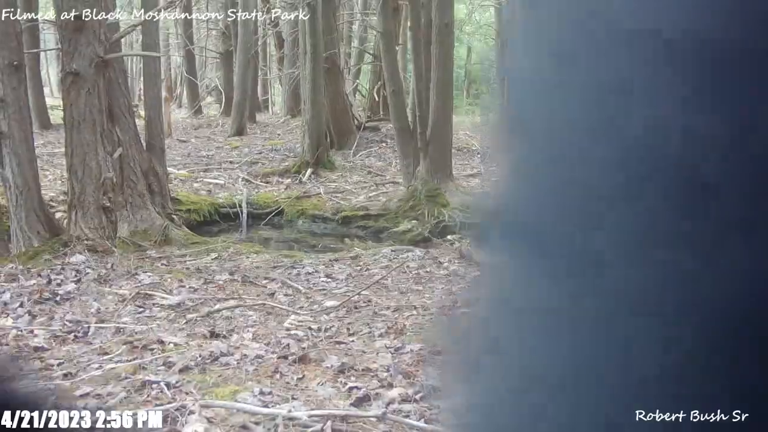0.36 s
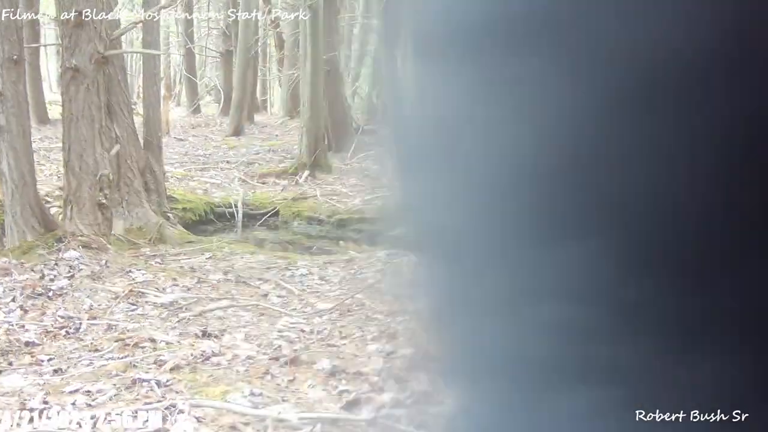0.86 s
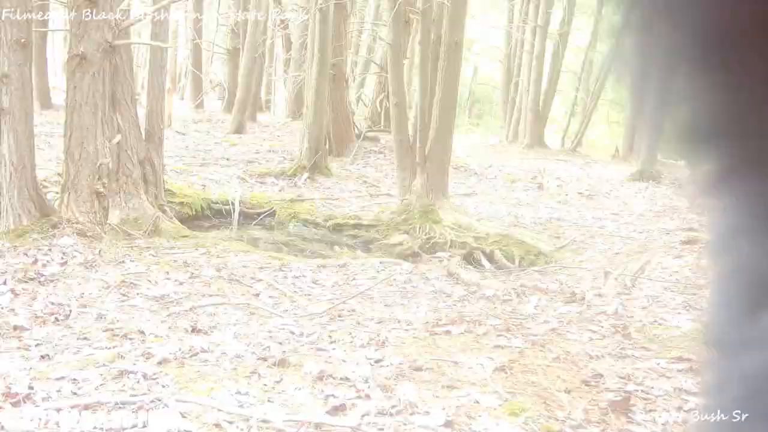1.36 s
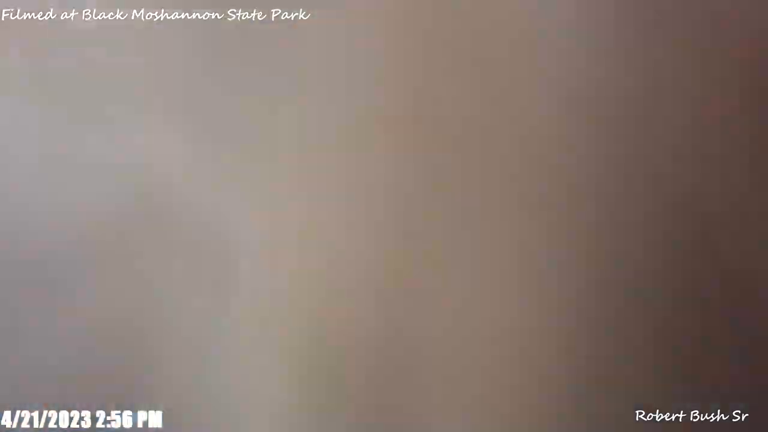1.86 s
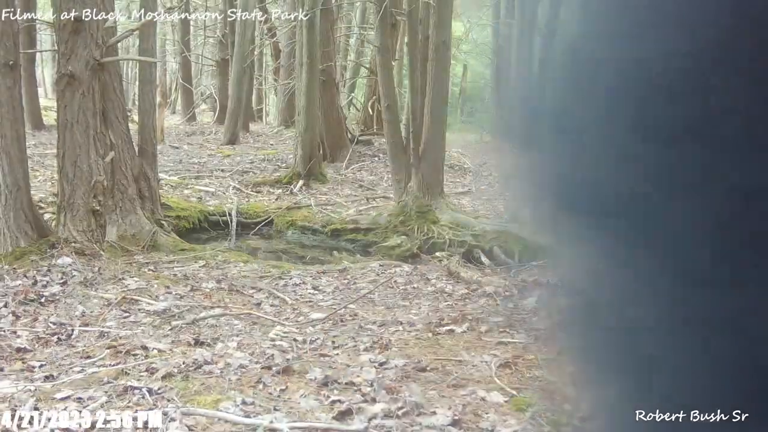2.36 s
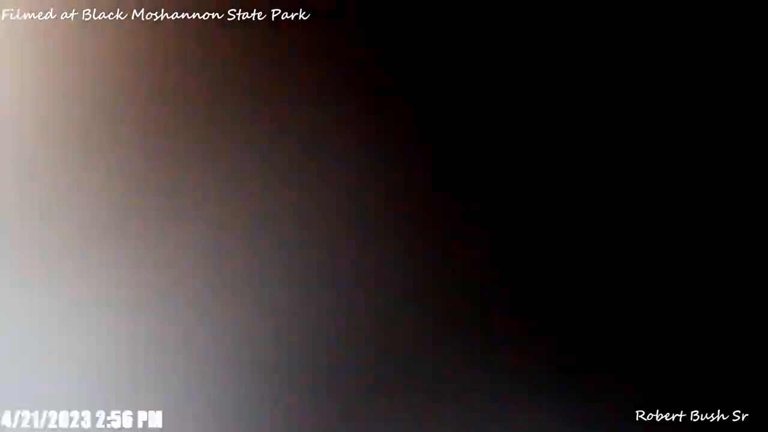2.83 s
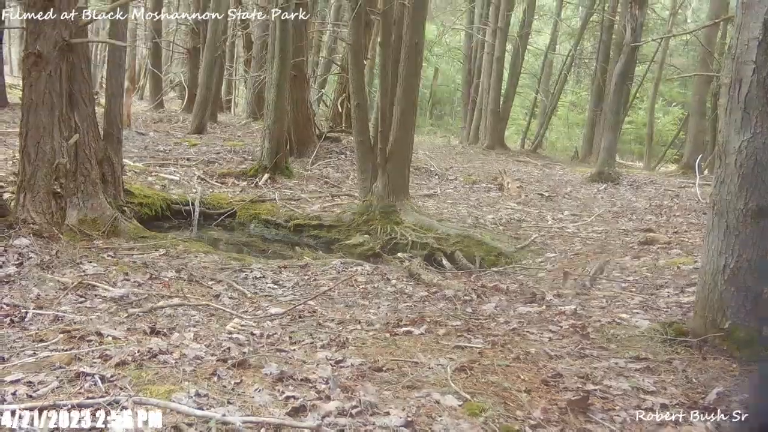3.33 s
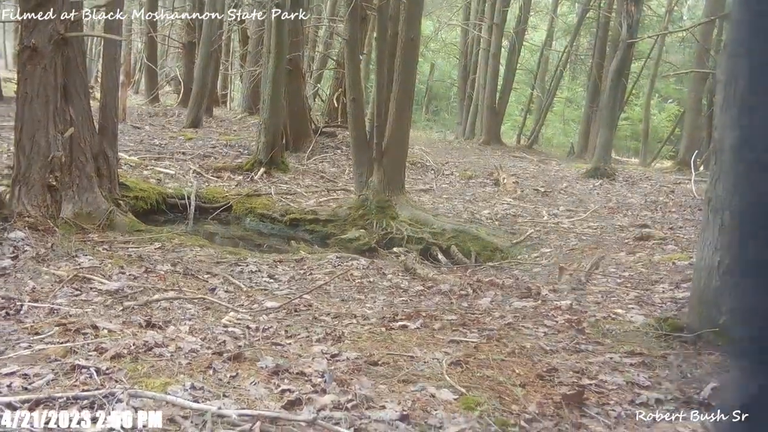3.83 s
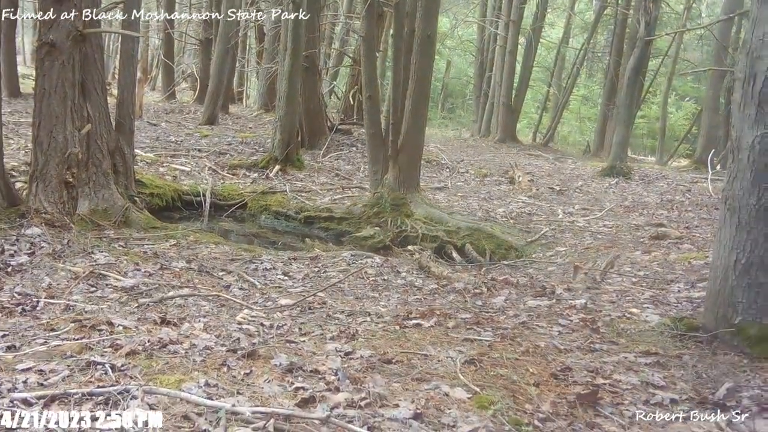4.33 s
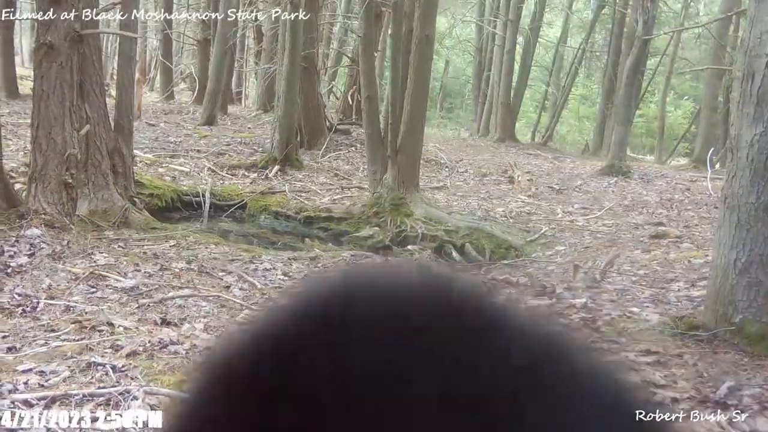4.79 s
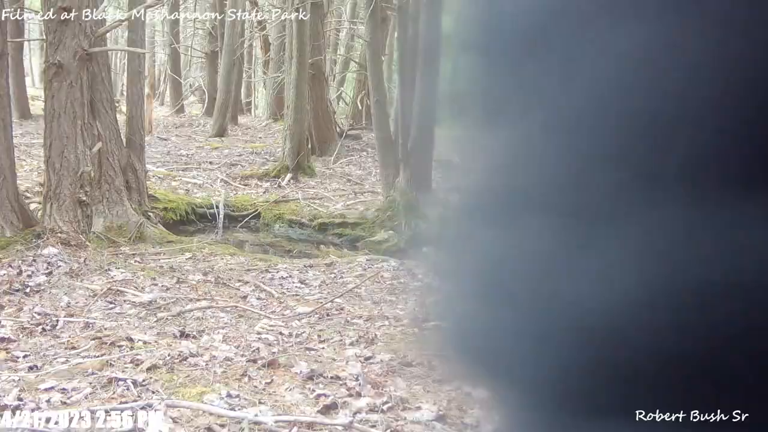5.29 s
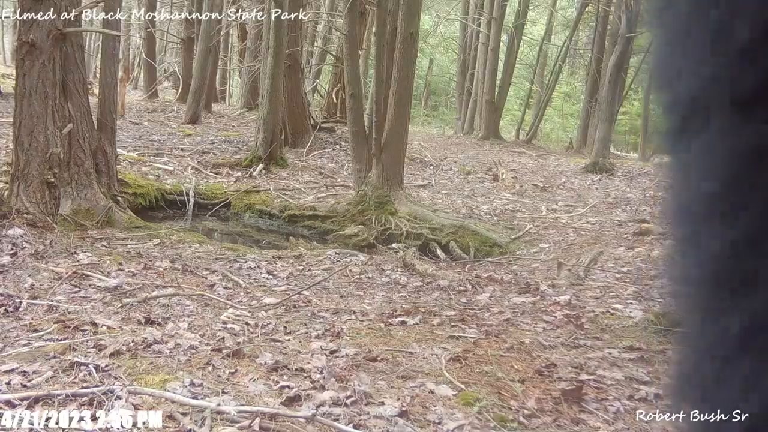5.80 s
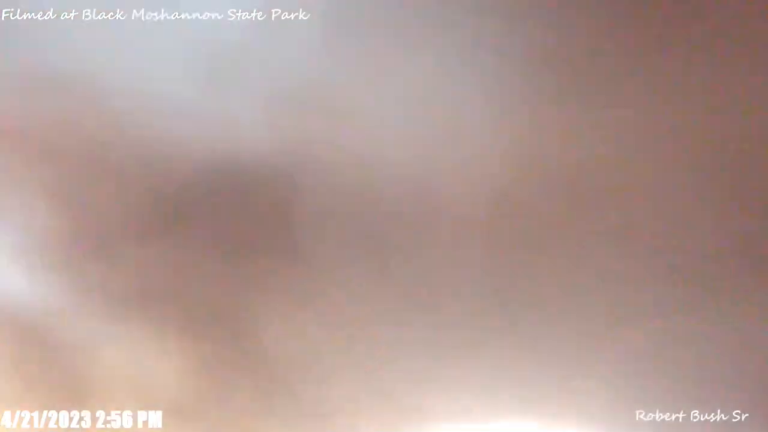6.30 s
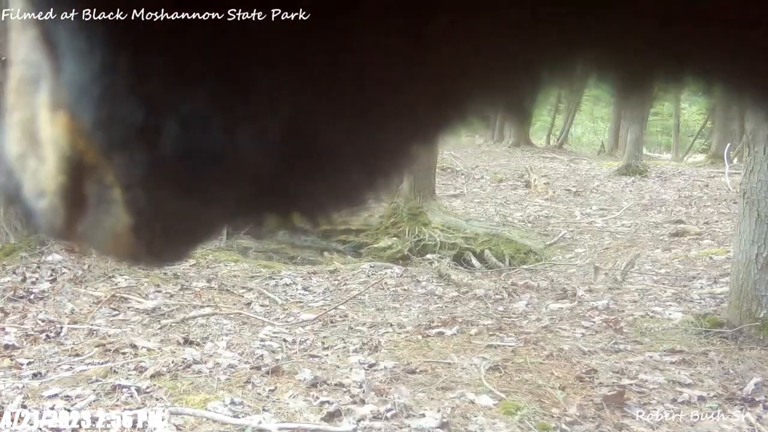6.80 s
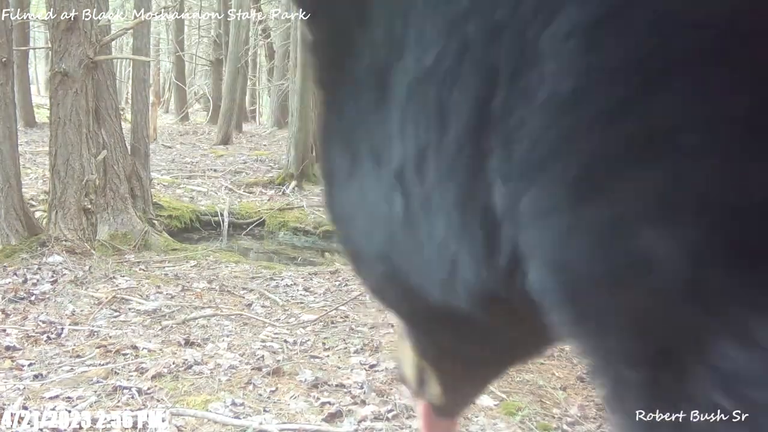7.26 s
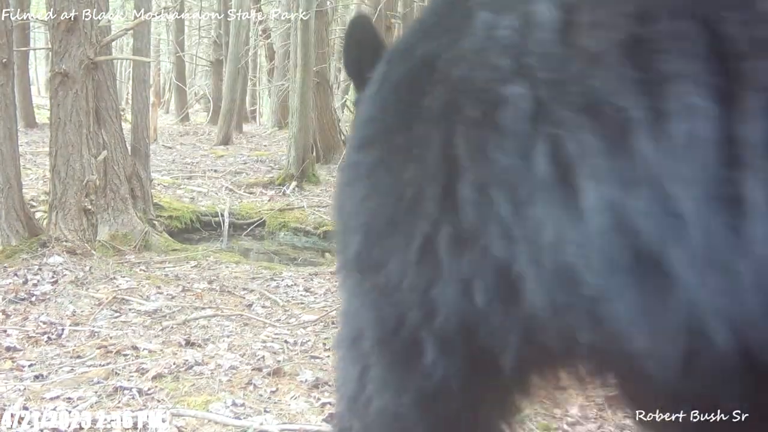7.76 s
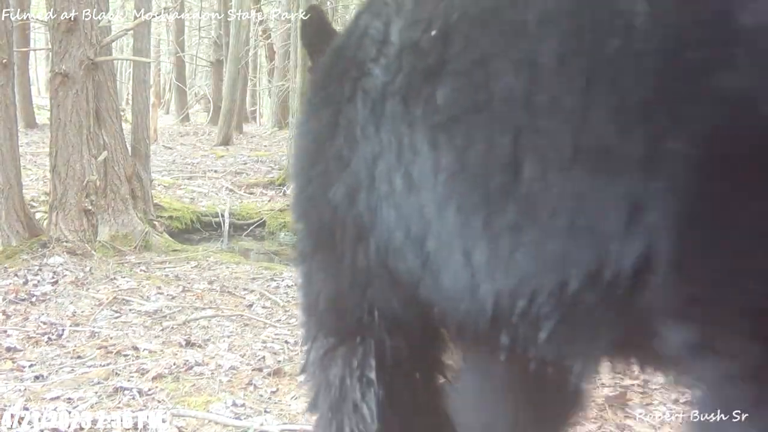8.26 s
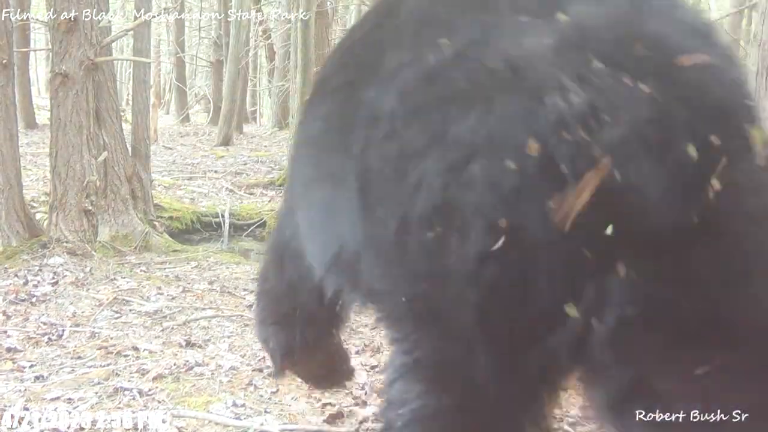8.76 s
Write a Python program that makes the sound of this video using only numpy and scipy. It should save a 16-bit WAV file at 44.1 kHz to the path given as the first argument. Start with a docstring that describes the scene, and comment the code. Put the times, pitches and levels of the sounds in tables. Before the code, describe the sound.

Close, coarse fur scrapes and sharp hollow plastic blows batter a shell on a tree, easing to a faint hiss at the end.

```python
"""Fur rasps over a thin plastic shell, and at once a hard blow lands, over quiet woodland.
A bear noses a small camera housing strapped to a tree: fur and muzzle drag in strokes of slipping
hairs; teeth, claws and the latch give knocks, skids and pushes on the mount.
The microphone sits inside the shell, hears its modes, and overloads on the hardest blows."""
import sys
import numpy as np
from scipy import signal
from scipy.fft import rfft, irfft
from scipy.io import wavfile
from scipy.ndimage import uniform_filter1d

SR = 44100
rng = np.random.default_rng(int(sys.argv[2]) if len(sys.argv) > 2 else 0)


def to_linear_factor(level_db):
    """Convert decibel levels (scalar or array-like) to linear amplitude factors."""
    exponent = np.asarray(level_db, float) / 20
    return 10 ** exponent


def wrap_up_sound(samples):
    """Save the sound to the file named by the first command line argument, as 16-bit audio."""
    columns = np.atleast_2d(samples).T
    # keep every value between -1 and 1, then stretch to whole-number steps
    tamed = np.clip(columns, -1, 1)
    steps = np.round(tamed * 32767).astype(np.int16)
    wavfile.write(sys.argv[1], SR, steps)


N = 391608


def evened(x):
    """Scales to rms 1."""
    return x / np.sqrt(np.mean(x ** 2) + 1e-20)


def add(mix, start_s, sound):
    """Mixes a sound in at start_s."""
    part = mix[round(start_s * SR):][:len(sound)]
    part += sound[:len(part)]


def woods():
    """Far leaves and preamplifier hiss as coloured noise, with the electronics' whine as thin sines."""
    # spectrum of the hiss, relative: hz, density_db
    hiss_colour = [(20, -11.5), (60, -2.5), (350, 3), (960, 4.5), (1700, 0.5), (2550, -4.5), (4000, -16.5),
                   (6200, -30), (9000, -33), (16000, -38.5)]
    # electronics: pitch_hz, rms_db
    whine_tones = [(7827, -83), (7768, -91)]
    hiss_rms_db = -56
    hz = np.fft.rfftfreq(N, 1 / SR)
    point_hz, density_db = np.transpose(hiss_colour)
    colour = to_linear_factor(np.interp(np.log(hz + 1), np.log(point_hz), density_db))
    mix = to_linear_factor(hiss_rms_db) * evened(irfft(rfft(rng.standard_normal(N)) * colour, N))
    t = np.arange(N) / SR
    for pitch_hz, rms_db in whine_tones:
        mix += np.sqrt(2) * to_linear_factor(rms_db) * np.sin(2 * np.pi * (pitch_hz * t + rng.random()))
    return mix


def pressure(t):
    """Pressure and treble of the fur: pushes add in power; treble is their power-weighted mean."""
    # one row a push of the muzzle: top_s, rise_s, fall_s, pressure_db, treble_db
    pushes = [(0.056, 0.036, 0.17, -29.5, -16.5), (0.268, 0.62, 0.29, -27.5, -18),
              (.47, 0.12, .1, -35.5, -20.5), (.67, 0.34, 0.31, -41, -22), (.807, 0.16, 0.12, -34, -29),
              (1.01, 0.14, 0.23, -27, -22), (1.15, 0.45, 0.22, -28.5, -9),
              (1.299, 0.71, 0.069, -27.5, -12.5), (1.35, .1, 0.022, -35.5, -14.5),
              (1.48, 0.38, 0.092, -40.5, -19), (1.62, 0.17, 0.11, -19, -16),
              (1.871, 0.11, 0.24, -25.5, -19), (1.911, 0.037, 0.052, -23, -21),
              (2.038, 0.45, 0.029, -36.5, -8.5), (2.18, .25, 0.19, -44, -18), (2.33, 0.19, .08, -46, -19),
              (2.383, 0.053, 0.052, -36, -26.5), (2.45, .08, .08, -50, -34), (2.585, 0.16, 0.16, -35, -19),
              (2.73, 0.15, 0.25, -26.5, -13.5), (2.85, 0.25, 0.25, -30, -12),
              (3.01, 0.18, 0.077, -40, -11.5), (3.14, 0.13, 0.17, -50.5, -22),
              (3.225, 0.059, 0.069, -41, -22.5), (3.27, .05, .05, -44.5, -23.5),
              (3.37, 0.16, 0.13, -43, -26), (3.447, 0.047, 0.057, -33, -23.5),
              (3.535, 0.063, 0.16, -37.5, -31.5), (3.756, 0.22, .1, -42.5, -27.5),
              (3.911, 0.28, 0.29, -45, -14), (4.029, 0.12, 0.055, -29, -17), (4.09, .05, .04, -43.5, -20),
              (4.22, 0.063, 0.14, -36.5, -21.5), (4.3, 0.12, 0.24, -28, -17.5),
              (4.395, 0.058, .14, -22.5, -20.5), (4.48, 0.13, .06, -32.5, -21.5),
              (4.71, .26, 0.27, -33, -21), (4.97, 0.11, 0.33, -38.5, -23.5), (5.08, .05, 0.15, -29, -20),
              (5.141, 0.15, 0.099, -26, -19), (5.396, .17, 0.35, -27.5, -17), (5.56, 0.17, .17, -24, -11),
              (5.74, 0.14, 0.19, -44.5, -14.5), (6.011, 0.16, .12, -39, -16),
              (6.143, 0.014, 0.031, -30.5, -24.5), (6.261, 0.12, 0.21, -31, -32),
              (6.39, 0.17, 0.056, -30.5, -29), (6.435, 0.07, .015, -40, -22.5)]
    edge_db, roundness = 28, 1.6  # loss one rise or fall from the top; how round the top is
    top_s, rise_s, fall_s, top_db, treble_db = np.transpose(pushes)[..., None]
    away = np.where(t < top_s, (top_s - t) / rise_s, (t - top_s) / fall_s)
    power = to_linear_factor(2 * np.maximum(top_db - edge_db * away ** roundness, -150))
    total = power.sum(0)
    return 10 * np.log10(total), (power * treble_db).sum(0) / total


def slips(count, per_s, spread_db):
    """Sparse clicks of random sign; a few are much larger than the rest."""
    chance = rng.random(count)
    sign = rng.choice([-1., 1.], count)
    size = np.minimum(rng.exponential(1, count), 4)
    return evened(sign * to_linear_factor(spread_db * size) * (chance < per_s / SR))


def shell(hz, centre_hz, slope_db_per_octave, treble_db):
    """Gain of the shell: modes add in power; those far from the contact colour are excited less."""
    # modes: mode_hz, width_hz (before the skirts are steepened), level_db
    modes = [(198.3, 750, 2.5), (315, 220, 8), (532, 410, 4.5), (800, 570, 4.5), (1006, 150, 4.5),
             (1280, 400, 7.5), (1700, 790, 4), (2100, 260, 1.5), (2402, 460, 5), (2948, 870, -1.5),
             (3620, 1500, -5.5), (4220, 2400, 3.5), (5200, 1000, -3.5), (5910, 1840, 6.5), (6880, 2100, -5),
             (11500, 8500, -23.5)]
    treble_hz = 4000  # modes above follow the hardness of the contact
    power = 1e-9
    for mode_hz, width_hz, level_db in modes:
        if mode_hz > treble_hz:
            near_db = treble_db
        else:
            steeper_below = np.where(mode_hz < centre_hz, 1.3, 1)
            near_db = -slope_db_per_octave * abs(np.log2(mode_hz / centre_hz)) * steeper_below
        detuning = (hz ** 2 - mode_hz ** 2) / (hz * width_hz + 1)
        power = power + to_linear_factor(2 * (level_db + near_db)) / (1 + detuning ** 2) ** 2.64
    return np.sqrt(power)


def low(x, hz):
    """Keeps the bass that the mount passes."""
    return signal.sosfilt(signal.butter(2, [22, hz], "band", fs=SR, output="sos"), x)


def strokes():
    """Hairs slip one by one over a smooth hiss; pressure comes in lumps, more so in a light touch."""
    # where the muzzle rests: time_s, colour_hz (at middle pressure), hollow_db
    spots = [(0, 1500, 1), (.5, 1300, 0.5), (.7, 1900, 0.8), (1.3, 1500, -1.4), (1.9, 1800, 0.5),
             (2.3, 1500, 3.5), (2.9, 1350, -0.1), (3.6, 1450, -0.5), (4.3, 1300, 1.5), (4.701, 1300, 0.5),
             (5.13, 1143, 10.5), (5.25, 1300, 2), (5.56, 1807, -2.3), (5.9, 1350, -1.57), (6.4, 1450, -0.8)]
    middle_db, octaves_per_db = -29.5, 0.067  # the colour climbs as the fur is pressed harder
    hollow_hz, hollow_width_hz = 1200, 350  # a nostril over the shell is a closed pipe
    patchy_db, calm_hz = 3.0, 4500
    lumps_db, lumps_per_db = 1.02, 0.02
    rumble_db, rumble_follow = -63.5, 0.55  # at middle pressure; dB per dB of pressure

    noise, lumps, sway = rng.standard_normal((3, N))
    fur = slips(N, 2800, spread_db=3.0) + noise
    hz, frame_s, z = signal.stft(fur, SR, nperseg=512, noverlap=384)
    pressure_db, treble_db = pressure(frame_s)
    pressed_db = np.maximum(pressure_db - middle_db, -25)
    time_s, colour_hz, hollow_db = np.transpose(spots)
    centre_hz = np.interp(frame_s, time_s, colour_hz) * 2 ** (octaves_per_db * pressed_db)
    gain = shell(hz[:, None], centre_hz, 2.7, treble_db)
    pipe = sum(np.exp(-((hz - hollow_hz * odd) / hollow_width_hz) ** 2) for odd in (1, 3))
    gain *= to_linear_factor(np.outer(pipe, np.interp(frame_s, time_s, hollow_db)))

    # the touched spot wanders, so the colour drifts; the treble stays even
    patches = uniform_filter1d(rng.standard_normal(z.shape), size=5, axis=0)
    patches = evened(uniform_filter1d(patches, size=20, axis=1))
    gain *= to_linear_factor(patchy_db * patches / (1 + (hz[:, None] / calm_hz) ** 2))
    gain /= np.sqrt((gain ** 2).mean(0))  # level is left to the pressure
    rub = evened(signal.istft(z * gain, SR, nperseg=512, noverlap=384)[1][:N])

    level_db = np.interp(np.arange(N) / SR, frame_s, pressure_db)
    depth_db = np.clip(lumps_db - lumps_per_db * (level_db - middle_db), 0, 5)
    smooth_lumps = evened(uniform_filter1d(uniform_filter1d(lumps, size=250), size=250))
    # the mount shakes under the weight
    rumble = to_linear_factor(rumble_db + rumble_follow * (level_db - middle_db)) * evened(low(sway, 150))
    return to_linear_factor(level_db) * to_linear_factor(depth_db * smooth_lumps) * rub + rumble


def ring(drive, *contact):
    """Passes a short contact through the causal (minimum-phase) response with the shell's gain."""
    size = 4096
    cepstrum = irfft(np.log(shell(np.fft.rfftfreq(size, 1 / SR), *contact)), size)
    cepstrum[1:size // 2] *= 2
    cepstrum[size // 2 + 1:] = 0
    return irfft(rfft(drive, size) * np.exp(rfft(cepstrum)), size)


def knocks():
    """Each blow is a sharp first contact and a short dying chatter; once a loose metal part rings."""
    # blows: start_s, peak_db (before overload), centre_hz of the contact colour, treble_db
    blows = [(.04, -2, 1480, -34), (0.273, 1, 1040, -47), (0.312, -7.5, 1640, -36), (.351, -16, 1280, -37),
             (.373, -15.5, 503, -39), (0.389, -10, 1340, -38), (.397, -3, 1160, -42),
             (.451, -18.5, 493, -38), (0.475, -18, 910, -34), (0.483, -8, 1220, -41),
             (0.536, -15, 497, -47), (.626, -21.5, 532, -30), (.656, -23, 2410, -34),
             (.676, -28, 2100, -32), (0.691, -23, 1750, -20), (0.715, -17.5, 2350, -31),
             (.741, -19.5, 851, -27), (.771, -16.5, 1290, -26), (0.815, -15, 2380, -28),
             (.887, -15, 2204, -38), (.903, -18, 516, -36), (1.025, -10.5, 1410, -30.5),
             (1.298, -12.5, 1430, -26), (1.457, -11, 2390, -13), (1.726, -25.5, 664, -43),
             (1.748, -16, 1700, -19), (2.206, 1.3, 1470, -24), (2.219, -8, 1280, -38),
             (2.377, -18, 790, -30), (2.701, -2, 1400, -39), (2.84, -16, 1200, -3), (3.217, -22, 1216, -23),
             (3.382, -24.5, 975, -40), (3.446, -24, 1200, -25), (3.522, -19, 1270, -19),
             (3.593, 3, 1280, -34), (3.627, -2, 1350, -52), (3.728, -19, 1680, -29),
             (3.743, -15, 543, -30.5), (3.773, -19, 1670, -27), (3.819, -15, 1590, -29),
             (3.852, -28, 538, -31), (4.058, -21.5, 900, -42), (4.377, -9, 1250, -41),
             (4.561, -21.5, 528, -42), (4.718, 7, 1250, -23), (4.781, -25, 546, -39),
             (4.829, -9.5, 796, -38), (4.86, -15.5, 1130, -36), (4.906, -24.5, 530, -34),
             (4.965, 5, 1370, -25.5), (5.135, -22.5, 450, -36), (5.326, -2, 1470, -29),
             (5.463, 2, 1260, -42), (5.95, 0.7, 1280, -28), (6.164, -6, 1580, -32), (6.247, -18, 1350, -34),
             (6.389, 2.5, 1700, -22)]
    # loose metal part, one row: start_s, pitch_hz, peak_db, t60_s
    latch = (3.632, 3930, -43, .11)
    chatter_s, chatter_hz, chatter_power = 0.019, 1300, -.15  # t60 at this colour; duller is longer
    octaves_per_db = -0.0259  # harder blows chatter more briefly
    out, t = np.zeros(N), np.arange(4096) / SR
    chatter = rng.standard_normal((len(blows), len(t)))
    for (start_s, peak_db, centre_hz, treble_db), noise in zip(blows, chatter):
        t60_s = chatter_s * (centre_hz / chatter_hz) ** chatter_power
        t60_s *= 2 ** (octaves_per_db * (peak_db + 10.5))
        drive = noise * to_linear_factor(-60 * t / t60_s) * (1 - np.exp(-t / 0.0013))
        drive[:8] += .9  # the first touch is one clean push
        sound = ring(drive, centre_hz, 9.15, treble_db)
        add(out, start_s, to_linear_factor(peak_db) * sound / abs(sound).max())
    start_s, pitch_hz, peak_db, t60_s = latch
    add(out, start_s, to_linear_factor(peak_db - 60 * t / t60_s) * np.sin(2 * np.pi * pitch_hz * t))
    return out


def crunches():
    """Teeth or claws skid: a dense run of hard slips through the shell."""
    # skids: start_s, length_s, first_db, last_db (before the taper), centre_hz of the contact colour
    skids = [(0.27, 0.012, 1, -16.5, 1700), (3.591, .025, -1, -6, 1154), (3.608, 0.028, -14.5, -18.5, 1495),
             (4.719, .018, -5.5, -17, 900), (5.946, 0.0095, -11, -4.5, 1200), (5.95, 0.06, -11, -30, 706),
             (6.302, 0.047, -27.5, -18, 1600), (6.346, 0.022, -5.5, -10.5, 1872),
             (6.39, 0.035, -24, -37, 1500)]
    treble_db = -25
    out = np.zeros(N)
    for start_s, length_s, first_db, last_db, centre_hz in skids:
        count = round(length_s * SR)
        drive = slips(count, 4000, spread_db=2.0) * to_linear_factor(np.linspace(first_db, last_db, count))
        drive *= signal.windows.tukey(count, .35)  # bites in and lets go softly
        sound = ring(drive, centre_hz, 4.4, treble_db)
        add(out, start_s, sound * np.linalg.norm(drive) / np.linalg.norm(sound))
    return out


def thumps():
    """Pushes that rock the whole camera on its strap: low-passed single swells."""
    # pushes on the mount: start_s, peak_db, push_s (time from onset to top, before the filter)
    mount_pushes = [(0.271, -17, 0.00083), (1.021, -30, 0.00081), (1.45, -31, 0.00061),
                    (1.601, -34, 0.0024), (2.103, -32, 0.00093), (2.13, -31.5, 0.00095),
                    (2.201, -20, 0.00049), (2.841, -44, 0.0014), (3.592, -15, 0.00044),
                    (4.058, -48.5, 0.002), (4.357, -26.5, 0.0014), (4.561, -28, 0.00038),
                    (4.721, -18.5, 0.0003), (4.963, -44.5, 0.0013), (5.129, -34, 0.0014),
                    (5.457, -50, 0.002), (5.944, -9, 0.00048), (5.961, -23, 0.0034),
                    (6.348, -21.5, 0.00096)]
    out, t = np.zeros(N), np.arange(SR // 5) / SR
    for start_s, peak_db, push_s in mount_pushes:
        push = low(t * np.exp(-t / push_s), 290)
        add(out, start_s, to_linear_factor(peak_db) * push / abs(push).max())
    return out


def scene():
    """Contact sounds over the quiet woods, one channel."""
    return (woods() + strokes() + knocks() + crunches() + thumps())[None]


def roll_off(x):
    """The treble ends steeply here."""
    return signal.sosfilt(signal.butter(12, 16230, fs=SR, output="sos"), x)


def record(dry):
    """The input clips hard at full scale; then the band is limited."""
    edge_hz = 16200
    clipped = np.clip(dry, -1, 1)
    limited = signal.oaconvolve(clipped, signal.firwin(255, edge_hz, fs=SR)[None], "same")
    return roll_off(limited)


dry = scene()
out = record(dry)
wrap_up_sound(out)
```